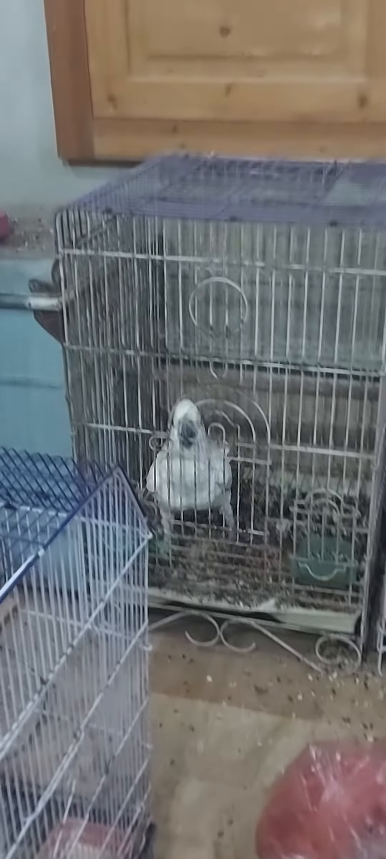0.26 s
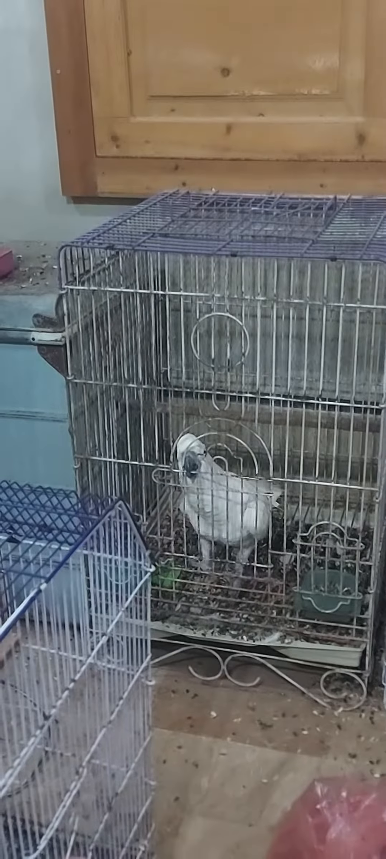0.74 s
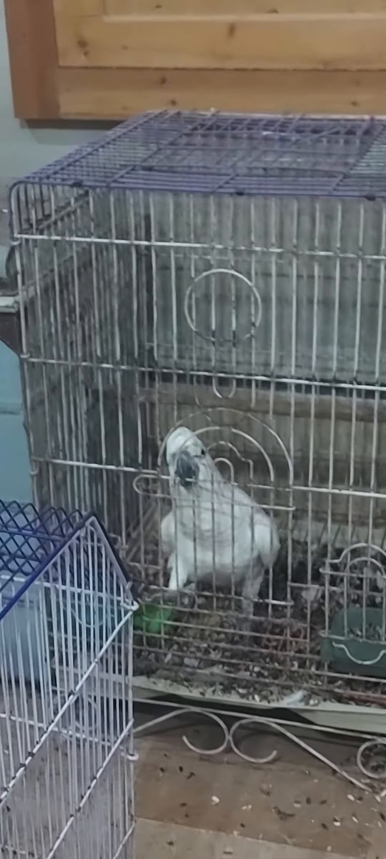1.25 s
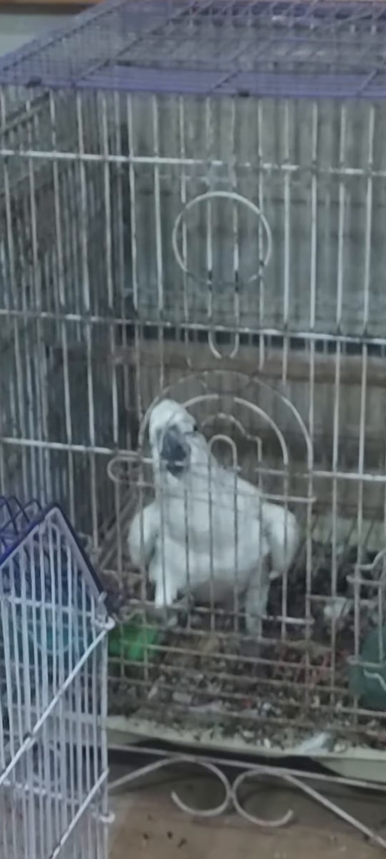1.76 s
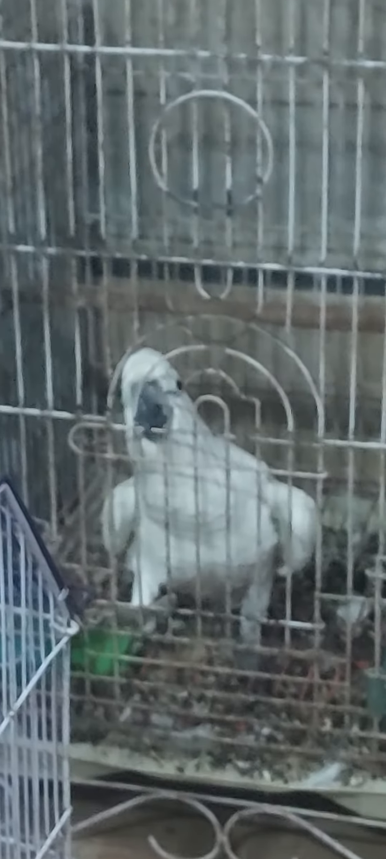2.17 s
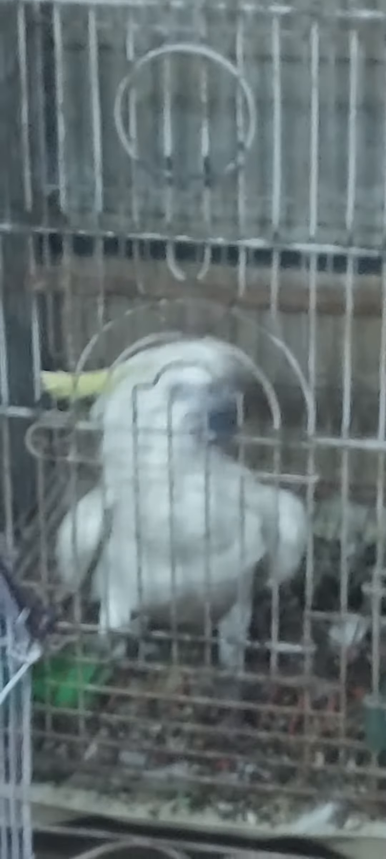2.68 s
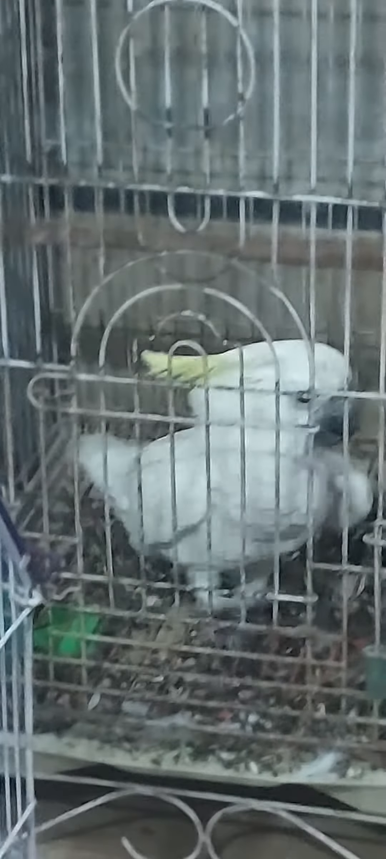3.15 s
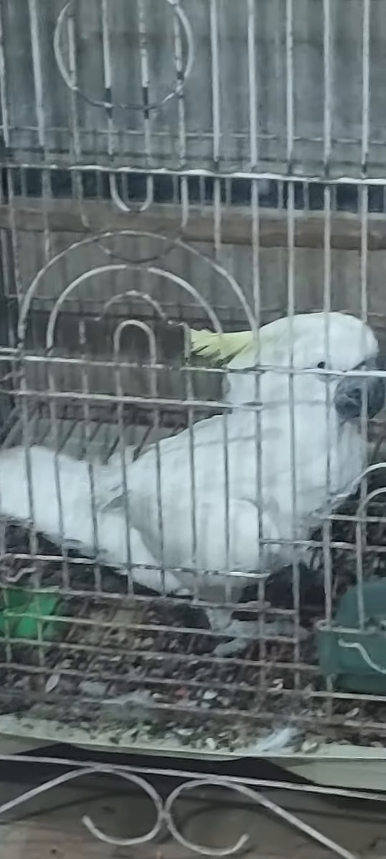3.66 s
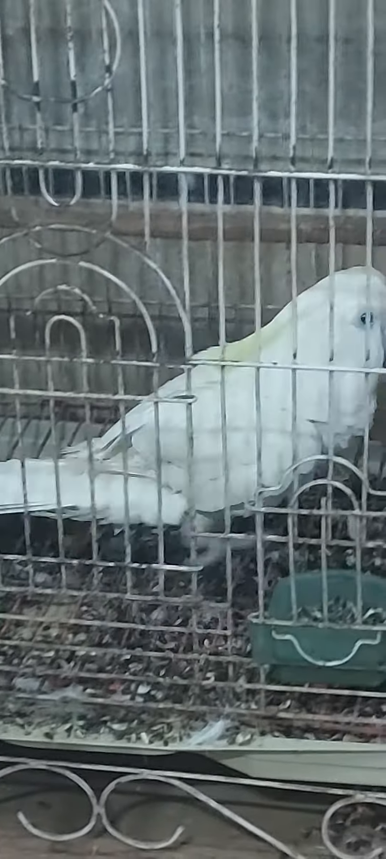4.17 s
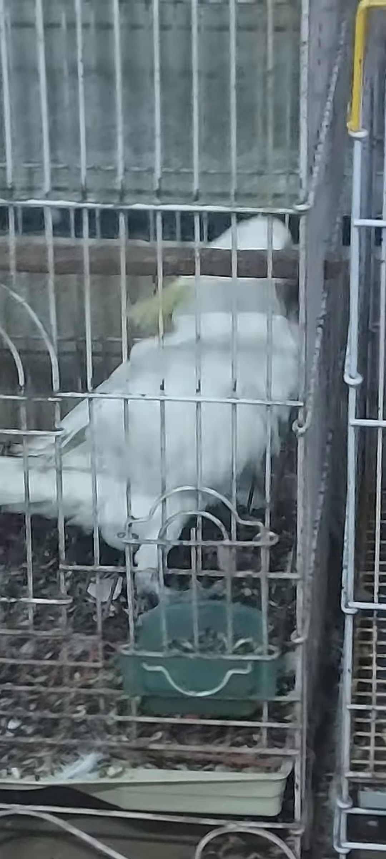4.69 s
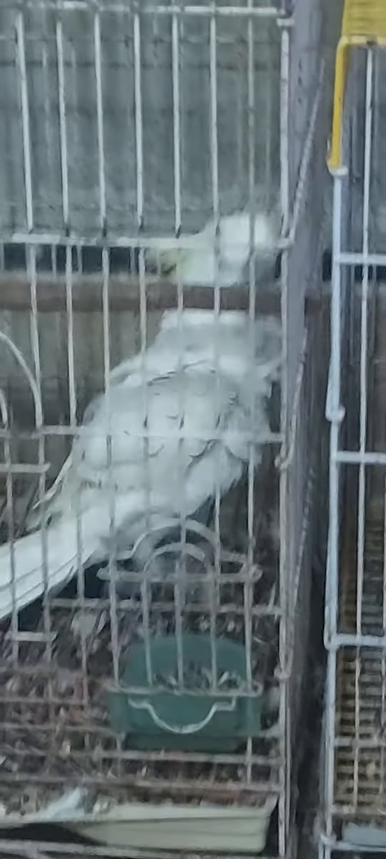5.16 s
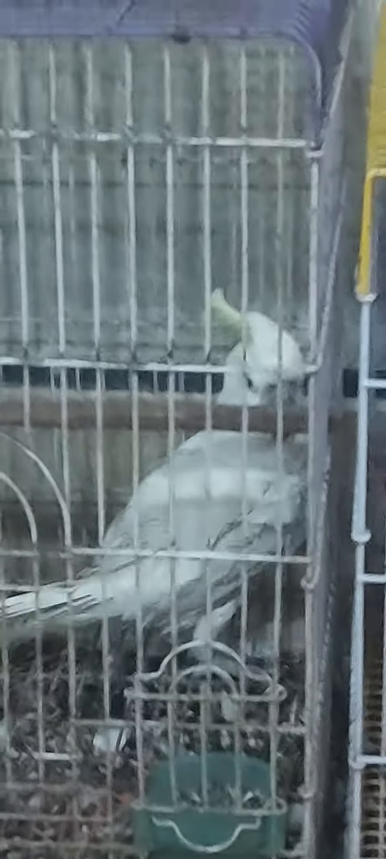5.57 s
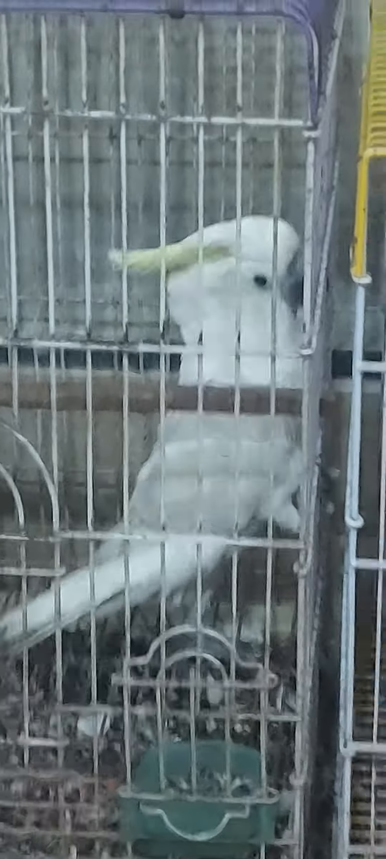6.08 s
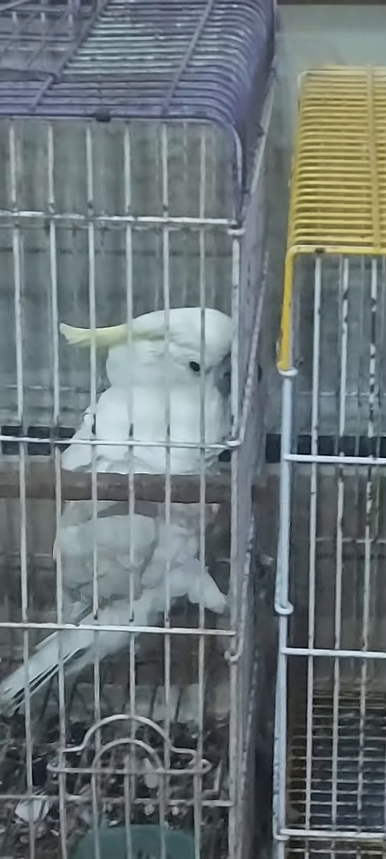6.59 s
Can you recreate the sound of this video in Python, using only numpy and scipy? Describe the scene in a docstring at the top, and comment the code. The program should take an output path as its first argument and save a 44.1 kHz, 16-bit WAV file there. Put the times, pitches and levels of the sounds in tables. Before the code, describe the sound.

A cockatoo screeches in a wire cage in a small hard-walled room, heard through a hand-held stereo microphone with a faint, slightly wavering mid-pitched appliance hum and soft room noise throughout. The first screech is already under way at 0 s; another follows at 0.1, then 0.5 and 0.9, the latter with a thin falling second note. Each lasts about a fifth of a second: raspy start, shrill pitch, then a rough, sagging end, with a short ringing room tail. Low hand rubbing rumbles until about 2.3 s, with faint rustles at 1.3 and 1.6. Screeches return at 1.8 and 2.1, then a run at 2.8, 3.2, 3.5 and 3.8, the first swelling strongly, with weak croaks between. A light rustle comes at 4.4, then final screeches at 5.1 and 5.7. Around 6.1 to 6.2 s soft dull bumps knock the microphone amid rubbing, and scuffs fade until 6.8, where a last rustle grows.

```python
"""A cockatoo screeches twelve times in a wire cage in a small, hard-walled room; the first is already under way.
Each screech starts as a rasp (noise), locks onto a shrill pitch (a stack of sine waves), doubles its period
(more sines halfway between) and turns rough, usually most at the end, as the pitch sags.
The bird also croaks and briefly sings a second note; rustles (noise) come now and then, and a few soft bumps
(ringing sines) near the end. An appliance hums (wavering sines) over background noise, and the hand-held
microphone rumbles and is rubbed (noise)."""
import sys
import numpy as np
from scipy import signal
from scipy.fft import rfft, irfft, next_fast_len
from scipy.io import wavfile
from scipy.ndimage import uniform_filter1d, map_coordinates

SR = 44100
rng = np.random.default_rng(int(sys.argv[2]) if len(sys.argv) > 2 else 0)


def unload_wav(signal):
    """Save mono or channel-first audio to the path in sys.argv[1] as 16-bit WAV at rate SR, clipped to [-1, 1]."""
    wavfile.write(
        sys.argv[1],
        SR,
        np.round(np.clip(np.atleast_2d(signal).T, -1, 1) * 32767).astype(np.int16),
    )


N = 301203
TIME = np.arange(N) / SR  # seconds

# The screeches. Each row: start in seconds, length in seconds, relative effort in dB,
# swell from start to end in dB, top pitch in Hz, place of the top (0-1), share of the pitch lost by the end (0-1),
# length of the opening rasp in seconds, roughness when held (0-1), roughness at the end (0-1),
# place where the period doubling is half grown (0-1), extra level of the fundamental in dB, treble in dB.
SCREECHES = [ (-.1, .18, -13, -9, 2240, 0.16, 0.06, .02, .3, 0.43, 0.78, -2.5, -3),
             (.1, 0.18, -14, -3.5, 2374, 0.15, 0.1, .012, 0.1, 0.69, 0.36, -1.5, 0.5),
             (0.47, .21, -16, 3.5, 2401, 0.2, .1, 0.048, .25, 0.53, 0.77, -1.5, -2.5),
             (0.907, .21, -15.5, -1, 2448, .2, 0.1, 0.039, .2, 0.82, 0.54, 0, 0),
             (1.758, 0.19, -15, 1, 2293, 0.31, 0.07, .05, .35, 0.64, 0.61, 1.5, 2),
             (2.085, 0.21, -16.5, 0, 2443, .23, 0.13, 0.041, .4, 0.66, .66, 1.5, 0),
             (2.791, 0.23, -17.5, 9.5, 2455, 0.12, .14, 0.036, .45, 0.68, 0.43, 2, 0.5),
             (3.16, 0.2, -18.5, 5.5, 2271, 0.23, 0.05, 0.026, 0.59, .65, .7, 1, 1.5),
             (3.526, 0.18, -16, 0, 2242, .42, 0.05, 0.044, 0.04, 0.48, .48, 1, 1.5),
             (3.801, .245, -17.5, -3.5, 2319, .42, .15, .018, .42, 0.35, 0.82, 3.5, -0.5),
             (5.118, 0.22, -16, 3, 2411, 0.24, 0.08, 0.044, .15, 0.69, 0.53, -2, 2),
             (5.673, .217, -15.5, 1, 2376, 0.28, 0.08, 0.047, .25, 0.74, 0.63, -1.5, 2.5)]
# Harmonics of the screech pitch. Each row: multiple of the pitch, relative level in dB.
HARMONICS = [(1, -6), (2, 2.5), (3, -9.5), (4, -17), (5, -17), (6, -23.5), (7, -27.5)]
# Lines halfway between the harmonics. Each row: multiple of the pitch, relative level in dB.
HALF_LINES = [(.5, -28.5), (1.5, -3.5), (2.5, -8), (3.5, -11), (4.5, -14.5), (5.5, -20.5), (6.5, -31)]
# The rasp as throat and beak colour it at a pitch of 2200 Hz. Each row: frequency in Hz, relative dB per Hz.
RASP = [(500, -60.5), (1000, -27), (1750, -14), (2200, -8), (2720, -4.5), (3250, -9), (3700, -0.5),
        (4350, -12), (5150, -8), (6600, -15.5), (8200, -15.5), (9200, -17), (12000, -26), (16000, -34.5)]
# Air hissing through the open beak. Each row: frequency in Hz, relative dB per Hz.
FIZZ = [(1000, -11.5), (5500, -23.5), (7000, -23.5), (8400, -13), (10000, -5), (12200, -2.5), (13500, -11),
        (15500, -9.5)]
# Fixed filter on the screeches: gentle dips near 2.8, 5.4 and 9.4 kHz. Each row: frequency in Hz, gain in dB.
SCREECH_DIPS = [(2450, -1), (2800, -7), (3250, 0.5), (4900, -1), (5400, -3), (6000, 0), (8600, 0),
                (9400, -5.5), (10300, 0)]
# The treble shelf, which depends on where the beak points. It holds: where it begins and ends to rise, in Hz.
TREBLE_HZ = (5500, 10000)
# How fast the room's tail dies. Each row: frequency in Hz, time to fall by 60 dB in seconds.
ROOM_T60 = [(500, 0.46), (2000, 0.51), (4400, 0.5), (8000, .44), (15000, 0.27)]
# The bird's sound between the two microphone ports. Each row: frequency in Hz, left minus right in dB.
PORT_BALANCE = [(1200, -1.5), (2300, -2), (3400, -7.5), (4400, -5.5), (5800, 2.5), (6800, 4), (8200, -17.5),
                (9600, 2), (15000, -3)]
# Background noise of the room. Each row: frequency in Hz, relative dB per Hz.
BACKGROUND = [(15, -67), (25, -31.5), (99, -15), (161, -17.5), (195, -17.5), (405, -12), (439, -14.5),
              (476, -6.5), (516, -14.5), (1070, -17.5), (1940, -23.5), (2410, -23), (6920, -40),
              (11900, -47.5), (16000, -63)]
# How alike noise is in both ports. Each row: frequency in Hz, left-right coherence (0-1).
PORT_LIKENESS = [(30, 0.66), (100, 0.95), (400, 0.41), (1000, 0.15), (4000, 0.074)]
# Tones of the appliance. Each row: frequency in Hz, level in dB before the left-right balance.
HUM = [(483.5, -54), (554.5, -66), (662, -75.5), (965, -68.5), (1104, -63.5), (1378, -70)]
# Rumble of the hand on the case. Each row: frequency in Hz, relative dB per Hz.
RUMBLE = [(25, -32.5), (60, -14.5), (110, 4.5), (160, 1), (210, -21), (310, 2), (450, -27), (1000, -49)]
# The hand shifts and rubs on the case. Each row: middle in seconds, length in seconds, peak level in dB.
RUBS = [(.17, 0.47, -50), (.84, 0.2, -52), (1.0, 0.53, -57), (1.41, 0.34, -46), (1.7, 0.23, -49),
        (1.93, 0.72, -53.5), (2.26, .22, -51.5), (4.451, 0.26, -62), (5.101, 1.0, -68.5),
        (6.08, 0.6, -52.5)]
# Soft bumps on the microphone's case. Each row: start in seconds, peak level in dB.
BUMPS = [(6.119, -35.5), (6.174, -33), (6.184, -23.5), (6.232, -33)]
# Ringing of the bumped case. Each row: frequency in Hz, relative level in dB, time to fall by 60 dB in seconds.
CASE = [(96.4, -0.5, 0.08), (191.3, 8, 0.021), (303, 15, 0.024), (790, -3, 0.022)]
# Low croaks. Each row: start in seconds, length in seconds, relative level in dB, first pitch in Hz, last in Hz.
CROAKS = [(0.186, 0.041, -33.5, 1105, 1028), (3.067, 0.089, -37.5, 1344, 801),
          (3.371, 0.121, -44.5, 969, 823), (3.73, 0.15, -37, 911, 1243)]
# The other side of the syrinx sings one falling note.
# It holds: start in seconds, length in seconds, relative level in dB, first pitch in Hz, last pitch in Hz.
SECOND_VOICE = (0.93, 0.156, -28, 4349.5, 3199.5)
# Rustles in the cage. Each row: start in seconds, relative level in dB,
# time to fall by 60 dB in seconds (a negative time makes the rustle grow instead).
RUSTLES = [(1.31, -60.5, 0.5), (1.62, -56, 0.3), (4.36, -61.5, 2.2), (6.139, -50.5, 0.77),
           (6.469, -51, 1.3), (6.781, -54, -8)]
# Colour of the rustles. Each row: frequency in Hz, relative dB per Hz.
RUSTLE_COLOUR = [(700, 7), (1800, 0), (4000, -0.5), (8000, -10), (10000, -11.5), (14000, -7.5),
                 (16000, -23.5)]

# How a screech runs
ONSET_DB, ONSET_S = -7.5, 0.039  # the effort builds up from this far below, in this time
OPENING_DB, LOCK_S = -8, 0.019  # the opening rasp is this much weaker, and locks onto the pitch this fast
CREAK_HZ, CREAK = 81, 0.82  # the opening rasp comes in pulses: their rate and depth
DOUBLING, DOUBLING_S = 0.8, 0.069  # strength of the half lines, and the time they take to grow
BREAK_S = 0.08  # roughness moves to its end value over this last stretch
CHAOS = 0.82  # how much of a fully rough tone turns into noise
FADE_DB, FADE_S = -4, 0.059  # the effort gives way at the very end
FILLING_DB = -1  # change of the fundamental from the start of a screech to its end


def gain_of(db):
    """Turns decibels into amplitude."""
    return 10 ** (np.asarray(db) / 20)


def evened(x):
    """Scales a sound to an average (rms) strength of 1."""
    return x / np.sqrt(np.mean(np.abs(x) ** 2) + 1e-20)


def read(points, hz):
    """Reads values between the rows of a frequency table, on a log-frequency axis."""
    f, value = np.transpose(points)
    return np.interp(np.log(hz + 1), np.log(f + 1), value)


def colour(x, spectrum):
    """Filters a sound by a (Hz, dB) table."""
    size = x.shape[-1]
    padded = next_fast_len(size + 2048)
    gain = gain_of(read(spectrum, np.fft.rfftfreq(padded, 1 / SR)))
    return irfft(rfft(x, padded) * gain, padded)[..., :size]


def wander(size, hz):
    """Random motion of rms 1, with speeds up to about hz."""
    padded = next_fast_len(size)
    f = np.fft.rfftfreq(padded, 1 / SR)
    slow = rfft(rng.standard_normal(padded)) * np.exp(-0.5 * (f / hz) ** 2)
    return evened(irfft(slow, padded)[:size])


def ramp(x):
    """Eases from 0 to 1 as x goes from 0 to 1."""
    return np.sin(np.pi / 2 * np.clip(x, 0, 1)) ** 2


def add(mix, s, sound):
    """Mixes a sound in at time s."""
    part = mix[max(round(s * SR), 0):][:len(sound)]
    part += sound[:len(part)]


def gesture(t, length, db, swell_db, top_hz, top_at, sag, opening, held_rough, end_rough, doubles_at):
    """One screech, t seconds in: effort, pitch in Hz, roughness, share of noise, strength of the half lines."""
    place = t / length
    hz = top_hz * (1 - sag * np.abs((place - top_at) / (1 - top_at)) ** 1.5)
    unlocked = 1 - ramp((t - opening) / LOCK_S + 1)  # 1 in the opening rasp, 0 once on pitch

    onset_db = ONSET_DB * (1 - ramp(t / ONSET_S))
    fade_db = FADE_DB * ramp((t - length) / FADE_S + 1)
    edges_db = onset_db + OPENING_DB * unlocked + fade_db
    creak = np.exp(CREAK * unlocked * np.cos(2 * np.pi * CREAK_HZ * t))
    effort = gain_of(db + swell_db * (place - 0.5) + edges_db) * creak

    breaking = ramp((t - length) / BREAK_S + 1)
    rough = np.clip(held_rough + (end_rough - held_rough) * breaking, 0, 1)
    noisy = np.clip(unlocked + CHAOS * rough ** 2, 0, 1)
    doubling = DOUBLING * ramp((t - doubles_at * length) / DOUBLING_S + 0.5)
    return effort, hz, rough, noisy, doubling


def screeches():
    """The syrinx swings with a shaky pitch; pushed harder it doubles its period, then turns chaotic."""
    jitter, rough_jitter = 0.01098, 0.0399  # pitch shake when smooth, and the extra when fully rough
    rasp_db, fizz_db = -1, -24
    attack, release = 0.0011, 0.027  # seconds
    out = np.zeros(N)
    shake = wander(N, 170)
    slip = 0.64 * wander(N, 120)  # the strong-weak alternation is less steady than the pitch
    puffs = np.exp(0.25 * wander(N, 190))  # the air flow is uneven
    rasp = evened(colour(rng.standard_normal(N), RASP))
    fizz = evened(colour(rng.standard_normal(N), FIZZ))
    for start, length, *manner, fullness_db, treble_db in SCREECHES:
        span = slice(max(round(start * SR), 0), round((start + length + release) * SR))
        t = TIME[span] - start
        effort, hz, rough, noisy, doubling = gesture(t, length, *manner)

        shaky_hz = hz * (1 + (jitter + rough_jitter * rough) * shake[span])
        phase = 2 * np.pi * np.cumsum(shaky_hz) / SR
        lowest, *upper = (gain_of(db) * np.sin((k + 1) * phase) for k, (_, db) in enumerate(HARMONICS))
        tone = gain_of(fullness_db + FILLING_DB * (t / length - 0.5)) * lowest + sum(upper)
        halves = sum(gain_of(db) * np.sin((k + 0.5) * phase + slip[span])
                     for k, (_, db) in enumerate(HALF_LINES))

        # the chaos comes from the same membranes: playing the rasp faster or slower slides it with the pitch
        pace = np.cumsum(hz / 2200)
        chaos = map_coordinates(rasp[span.start:][:SR // 2], [pace], order=3)
        noise = gain_of(rasp_db) * noisy * chaos + gain_of(fizz_db) * fizz[span]
        voice = np.sqrt(1 - noisy ** 2) * evened(tone + doubling * halves) + noise

        gate = np.clip((t - t[0]) / attack, 0, 1) * np.clip((t[-1] - t) / release, 0, 1)
        voice = colour(voice * puffs[span], list(zip(TREBLE_HZ, (0, treble_db))))
        out[span] += effort * gate * evened(voice)
    return colour(out, SCREECH_DIPS)


def room(x):
    """The direct sound, a few echoes off near walls, then a dense tail that dies fastest in the high treble."""
    direct_db, early_db, tail_db = -13.0, -2.5, -5
    size = SR * 4 // 5
    taps = rng.standard_normal((2, size)) * (np.arange(size) > 0.006 * SR)
    hz, t, z = signal.stft(taps, SR, nperseg=256)
    fading = gain_of(-60 * t / read(ROOM_T60, hz)[:, None])
    tail = signal.istft(z * fading, SR, nperseg=256)[1]
    response = gain_of(tail_db) * tail / np.linalg.norm(tail[0])
    for ear in response:
        at = (rng.uniform(0.0005, 0.011, size=16) * SR).astype(int)  # echo times, in samples
        ear[at] += gain_of(early_db) * rng.choice([-1, 1], len(at)) / np.sqrt(len(at))
    response[[0, 1], [1, 0]] += gain_of(direct_db)  # the right port is nearer by one sample
    return signal.fftconvolve(x[None], response, axes=1)[:, :N]


def air(spectrum):
    """Diffuse noise, more or less alike in the two ports depending on its pitch."""
    a, b = rfft(rng.standard_normal((2, N)))
    same = np.clip(read(PORT_LIKENESS, np.fft.rfftfreq(N, 1 / SR)), -1, 1)
    other = same * a + np.sqrt(1 - same ** 2) * b
    return evened(colour(irfft(np.array([a, other]), N), spectrum))


def hum():
    """An appliance's steady tones, wavering slightly in pitch and level."""
    tones = np.zeros(N)
    for hz, db in HUM:
        phase = 2 * np.pi * np.cumsum(hz * (1 + 0.00278 * wander(N, 8.4))) / SR
        tones += gain_of(db) * np.sqrt(2) * np.sin(phase)
    left_db, right_db = -3, 1.5
    return gain_of([[left_db], [right_db]]) * tones * (1 + 0.2 * wander(N, 4.0))


def handling():
    """The hand rumbles on the case and rubs it (noise), and bumps it (the case rings and dies away)."""
    grip_db = -71.5  # rumble of the hand held still
    level = gain_of(grip_db)
    for middle, length, db in RUBS:
        level = level + gain_of(db) * ramp(1 - 2 * np.abs(TIME - middle) / length)

    t, knocks = np.arange(SR // 4) / SR, np.zeros(N)
    ring = sum(gain_of(db - 60 * t / t60) * np.sin(2 * np.pi * hz * t) for hz, db, t60 in CASE)
    for s, db in BUMPS:
        add(knocks, s, gain_of(db) * ring / np.abs(ring).max())
    return knocks + level * air(RUMBLE)


def croaks():
    """Weak, slack and very unsteady swings of the syrinx: a gliding pitch and its octave."""
    out, shake = np.zeros(N), 1 + 0.16 * wander(N, 500)
    for s, length, db, first_hz, last_hz in CROAKS:
        size = int(length * SR)
        hz = np.linspace(first_hz, last_hz, size) * shake[round(s * SR):][:size]
        phase = 2 * np.pi * np.cumsum(hz) / SR
        voice = evened(np.sin(phase) + 1.4 * np.sin(2 * phase))
        add(out, s, gain_of(db) * voice * np.hanning(size))
    return out


def second_voice():
    """The syrinx's other side: one shaky sine that falls quickly, then levels out."""
    start, length, db, first_hz, last_hz = SECOND_VOICE
    out, size = np.zeros(N), int(length * SR)
    hz = last_hz + (first_hz - last_hz) * np.linspace(1, 0, size) ** 1.8
    phase = 2 * np.pi * np.cumsum(hz * (1 + 0.04 * wander(N, 200)[:size])) / SR
    add(out, start, gain_of(db) * evened(np.sin(phase)) * signal.windows.tukey(size, 0.15))
    return out


def rustles():
    """Scuffs of slightly uneven noise that start quickly and fade; one with a negative time grows."""
    rise = 0.0076  # seconds
    level = np.zeros(N)
    for s, db, t60 in RUSTLES:
        fading = gain_of(db - 60 * np.maximum(TIME - s, 0) / t60)
        level += fading * np.clip((TIME - s) / rise, 0, 1)
    uneven = rng.standard_normal(N) * np.exp(0.083 * wander(N, 90))
    return level * evened(colour(uneven, RUSTLE_COLOUR))


def scene():
    """The bird and its rustling cage in the room, over background noise, hum and handling."""
    background_db = -51.5
    bird = screeches() + second_voice() + croaks() + rustles()
    left, right = room(gain_of(4.5) * bird)
    # each port takes half of the left-right difference
    left = colour(left, [(hz, db / 2) for hz, db in PORT_BALANCE])
    right = colour(right, [(hz, -db / 2) for hz, db in PORT_BALANCE])
    return np.array([left, right]) + gain_of(background_db) * air(BACKGROUND) + hum() + handling()


def record(dry):
    """A limiter turns the loudest swells down, then a filter removes what lies above the band edge."""
    limit_db, edge_hz = -7.5, 15900
    power_db = 10 * np.log10(np.abs(uniform_filter1d((dry ** 2).max(0), size=128)) + 1e-12)
    recovery_db = 600 * TIME  # the level comes back by 600 dB a second
    held_db = np.maximum.accumulate(power_db + recovery_db) - recovery_db
    over_db = np.maximum(held_db - limit_db, 0)
    held = dry / gain_of(uniform_filter1d(over_db, size=64))
    edge = signal.firwin(511, edge_hz, window=("kaiser", 9), fs=SR)
    return signal.oaconvolve(np.clip(held, -1, 1), edge[None], "same")


dry = scene()
out = record(dry)
unload_wav(out)
```